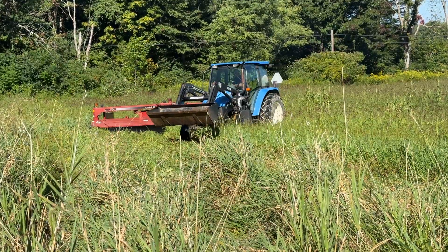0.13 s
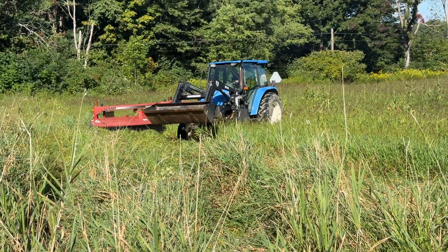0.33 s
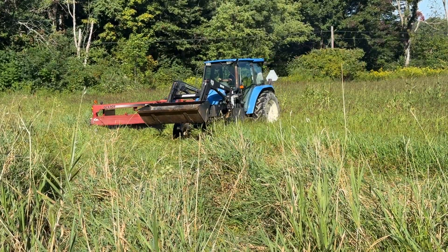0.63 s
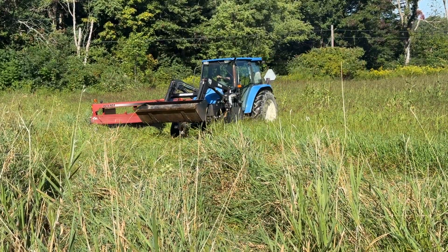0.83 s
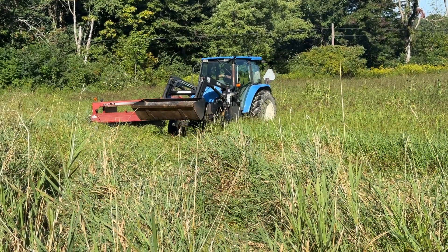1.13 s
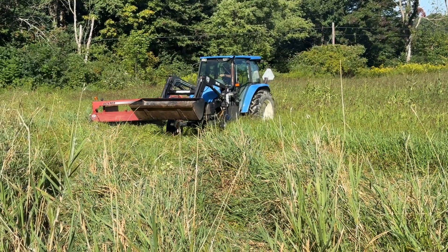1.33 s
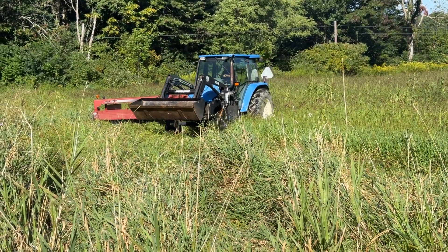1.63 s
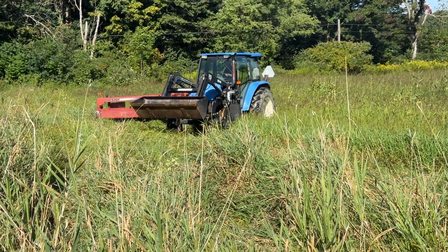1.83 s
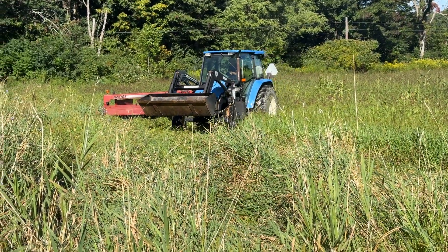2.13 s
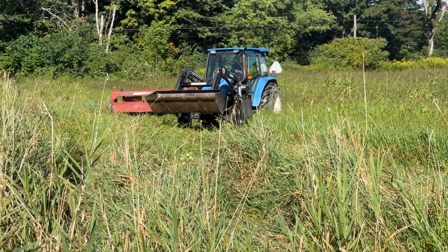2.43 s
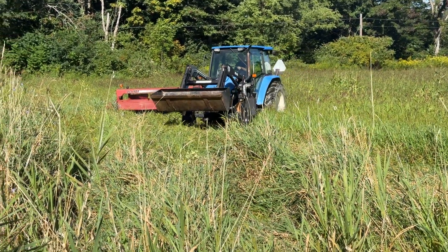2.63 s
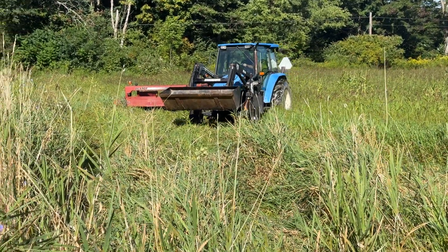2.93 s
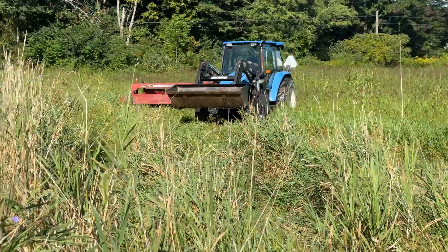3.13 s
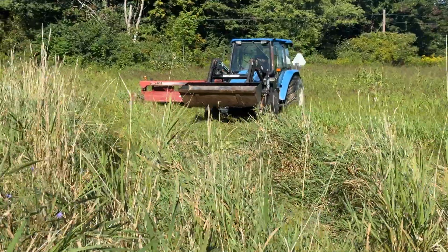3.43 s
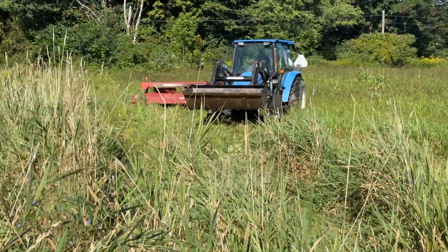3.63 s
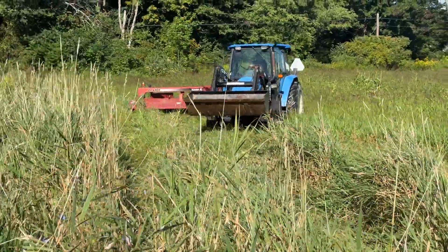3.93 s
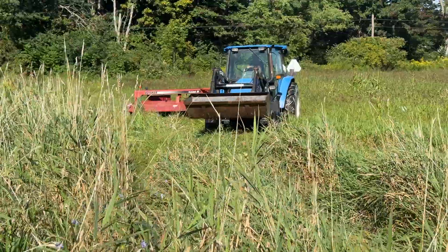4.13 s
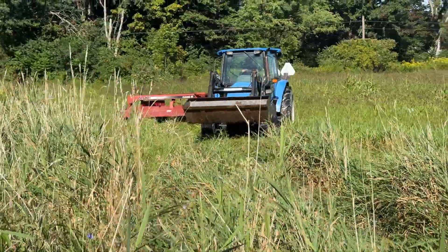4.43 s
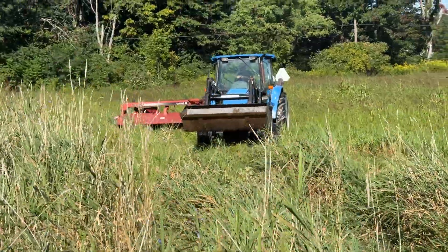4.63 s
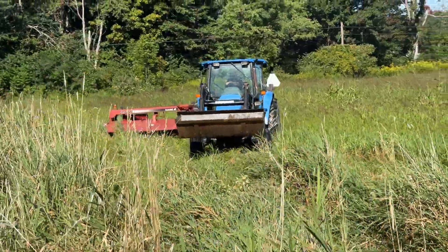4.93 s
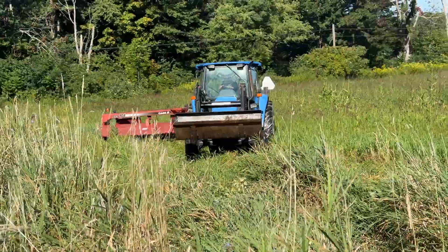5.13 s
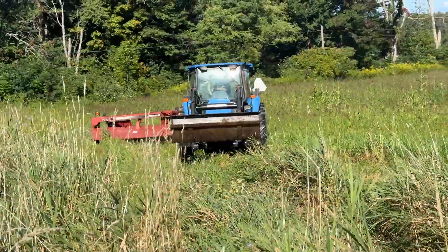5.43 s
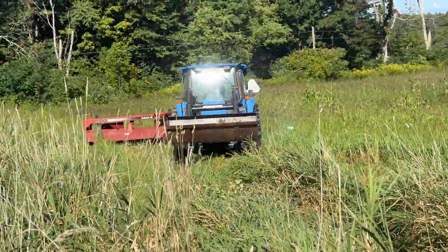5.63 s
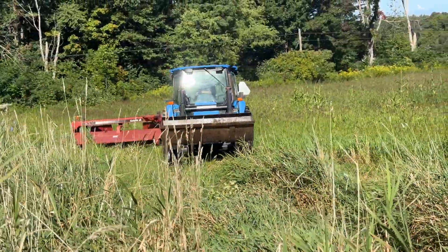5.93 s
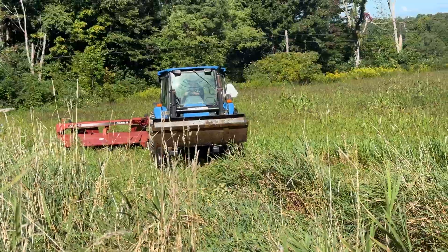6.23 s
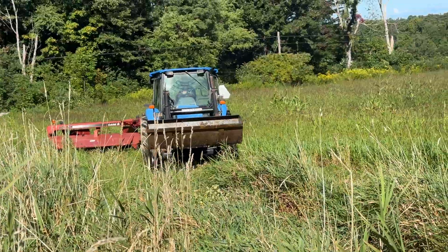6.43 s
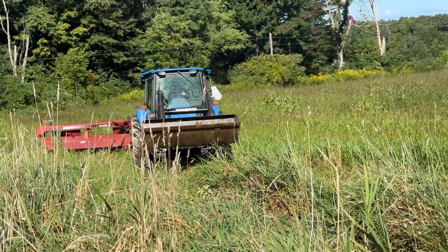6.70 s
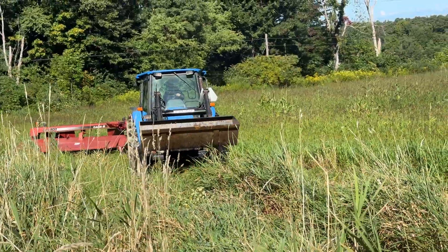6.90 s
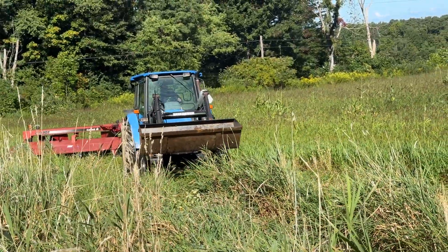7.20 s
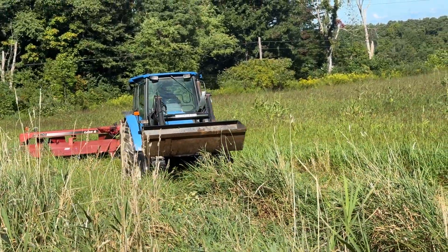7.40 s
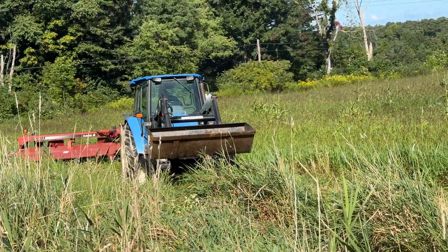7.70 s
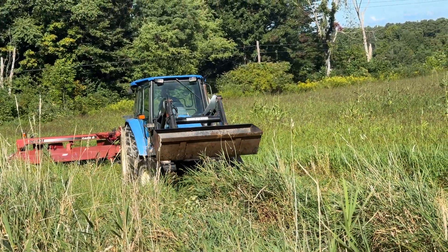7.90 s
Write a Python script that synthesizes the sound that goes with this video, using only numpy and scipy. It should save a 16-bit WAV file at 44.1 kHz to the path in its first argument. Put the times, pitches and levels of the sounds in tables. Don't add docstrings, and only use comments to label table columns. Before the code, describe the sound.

A diesel tractor drones and knocks steadily across a field while its disc mower hisses and clanks through tall grass, growing louder as it turns nearer.

```python
import sys
import numpy as np
from scipy import signal
from scipy.fft import rfft, irfft, next_fast_len
from scipy.io import wavfile
from scipy.ndimage import uniform_filter1d, map_coordinates

SR = 44100
rng = np.random.default_rng(int(sys.argv[2]) if len(sys.argv) > 2 else 0)


def dump_mix(stems):
    frames = np.atleast_2d(stems).T
    limited = np.clip(frames, -1, 1)
    pcm = np.round(limited * 32767).astype(np.int16)
    wavfile.write(sys.argv[1], SR, pcm)


def field_ratio(decibels):
    return 10 ** (np.asarray(decibels, dtype=float) / 20)


N = 355446

# (time [s], firing rate [1/s], blade-pass rate [1/s])
SPEED = [(0.0, 62.71, 85.15), (0.47, 63.04, 86.21), (0.95, 63.91, 87.37), (1.42, 63.23, 86.28),
         (1.9, 63.77, 87.02), (2.37, 65.32, 89.46), (2.84, 65.82, 89.87), (3.32, 66.02, 90.47),
         (3.79, 65.32, 89.26), (4.27, 65.21, 89.29), (4.74, 64.98, 88.91), (5.22, 65.04, 88.78),
         (5.69, 64.44, 88.22), (6.16, 64.31, 88.13), (6.64, 64.62, 88.35), (7.11, 64.24, 87.94),
         (7.59, 64.47, 88.27), (8.06, 63.1, 87.11)]
# (time [s], facing [0 flank - 1 front])
FACING = [(0, 0.26), (2.6, 0.28), (3.4, 0.39), (4.2, 0.64), (5.5, 0.69), (8.06, 0.52)]
# (time [s], level [dB])
LOAD = [(0, 0.5), (1, 0.5), (2, 1), (2.5, -2), (3, -6), (3.5, -2.5), (4, 0), (4.5, .5), (5.5, -0.5), (6, 1),
        (7, -1.5), (8.06, 0)]
# (time [s], level [dB])
APPROACH = [(0, -27.5), (2, -27.5), (2.6, -28.5), (3.5, -27.5), (4.5, -27.5), (5.3, -27), (6.2, -25.5),
            (7, -25), (8.06, -25.5)]
# (order [per firing], flank [dB], front [dB], growth with effort [dB/dB])
EXHAUST = [(1, -21.5, -20.5, 0.7), (2, -24, -17.5, -0.2), (3, -46.5, -28, 0.76),
           (1.75, -41.5, -28.5, -0.84)]
EXHAUST_LAG = [(1, -.175), (2, .4), (3, -.25), (1.75, -.1)]
# (order [per firing], flank [dB], front [dB])
BLOCK = [(3.75, -46, -47.5), (5.75, -56.5, -47), (7.25, -51, -39), (7.5, -52, -47.5), (9, -60, -32.5),
         (9.25, -46.5, -47), (9.5, -55, -36), (10.25, -52.5, -46), (11, -42, -54.5), (11.25, -48, -54),
         (12, -53, -55), (12.25, -53, -65), (12.75, -45, -62), (13.5, -42, -69)]
CYLINDERS = [-3.1, 0.33, 3.8, 0.42]
# (time [s], level [dB], width [s])
PUMP_SWELLS = [
    (1, -60, .7),
    (4.5, -55, .5),
    (5.4, -47, .3),
    (7.5, -50, .7),
]
# (order [per firing], time [s], level [dB], width [s])
PANELS = [(10.25, 3.2, -42, 1.0), (9, 4.4, -40, 1.0), (12.25, 2.4, -43, .45), (4.11, 3.5, -34, .8)]
# (frequency [Hz], density [dB/Hz])
FLANK_ROAR = [(80, -22.5), (140, -5), (180, -8), (350, -8.5), (400, -16.5), (500, -22.5), (600, -13),
              (640, -19), (800, -9), (1020, -29), (1220, -19.5), (1410, -12), (1570, -24), (2200, -24.5),
              (4800, -120)]
# (frequency [Hz], density [dB/Hz])
FRONT_ROAR = [(82, -27), (140, -14), (155, -8.5), (264, -7), (382, -11.5), (492, -13), (527, -12),
              (634, -17.5), (719, -16.5), (1150, -19), (2200, -29.5), (2860, -68), (4840, -120)]
# (order [per blade pass], flank [dB], front [dB], beat depth [dB], beat period [s], loudest at [s])
BLADES = [(1, -26.5, -27.5, 0.2, 3.9, 1.6), (2, -37.5, -34.5, 4.5, 5.1, 1.43),
          (3, -45, -33, 4.5, 6.4, 5.93), (4, -44, -34, 4.5, 6.9, 1.8), (6, -62, -17, 5, 9, .1)]
BLADE_WANDER = [(1, .01), (2, .13), (3, .2), (4, .2), (6, .25)]
# (order [per blade pass], flank [dB], front [dB])
GEARS = [(3.5, -54, -43), (5, -46.5, -41.5), (8, -46, -46.5), (9, -49.5, -62.5)]
# (time [s], level [dB])
CROP = [(0, -36), (.6, -38.5), (1.5, -36.5), (2, -38), (2.4, -35.5), (2.7, -38), (3.2, -36.5), (4, -35),
        (4.4, -33), (4.7, -34.5), (5, -33), (5.9, -34), (6.2, -32), (6.6, -35), (7, -32), (7.8, -32.5),
        (8.06, -32.5)]
# (frequency [Hz], density [dB/Hz])
STEMS = [(1200, -2.5), (1900, 1.5), (2800, 3), (4200, -1), (5400, -4), (7300, -6.5), (8500, -9.5),
         (11000, -20), (16000, -31)]
# (frequency [Hz], width [Hz], level [dB])
STEEL = [(2630, 1050, 0.5), (3490, 1920, -2), (5140, 300, 3), (8000, 2700, -16.5)]
# (frequency [Hz], width [Hz], level [dB])
KNIFE = [(2760, 90, 0), (2950, 200, -8)]
# (frequency [Hz], width [Hz], level [dB])
GUARD = [(2050, 60, 0)]
# (time [s], level [dB], width [s])
GUARD_RUBS = [
    (4.5, -42, .2),
    (5.05, -41, .28),
    (5.8, -44, .1),
]
# (time [s], level [dB], width [s])
BUMPS = [
    (1.6, -41.5, 0.31),
    (2.78, -39.5, 0.067),
    (3.14, -41, 0.092),
    (3.7, -36.5, 0.25),
    (5.1, -37.5, 0.38),
    (6.2, -48, 0.51),
    (7.16, -41, .1),
]
# (frequency [Hz], density [dB/Hz])
GROUND = [(20, -34), (35, -0.5), (55, 7), (100, 12), (160, -16), (260, -48)]
# (time [s], level [dB])
BREEZE = [(0, -58.5), (1.3, -58), (2.9, -58.5), (3.1, -59), (4.6, -51), (5.6, -47.5), (8.06, -49)]
# (time [s], level [dB], width [s])
GUSTS = [
    (1.55, -59.5, .1),
    (3.1, -52, .1),
    (3.41, -49, 0.23),
    (3.86, -51, 0.14),
    (4.19, -40, 0.13),
    (5.17, -46.5, .16),
    (6.2, -48, 0.12),
]
# (frequency [Hz], density [dB/Hz])
GRASS = [(2500, -33), (5000, -13), (8000, 4), (10000, 1.5), (13000, -3.5), (16000, -7)]
# (time [s], usual clank [dB], knife ring [dB])
SLACK = [(0, -26, -16), (1.5, -25, -17), (2.3, -23, -12), (2.8, -28, -17), (3.6, -25, -15), (3.85, -15, -9),
         (4.5, -14.5, -6), (5.15, -15, -10), (5.45, -18, -14), (6.1, -16, -13), (6.55, -17, -13),
         (7.1, -14.5, -15), (8.06, -16, -18)]
# (time [s], peak [dB])
LONE_CLANKS = [(0.231, -15.8), (0.44, -17.5), (0.649, -18.8), (0.695, -18.5), (0.902, -16), (0.97, -16),
               (1.2, -20.2), (1.246, -19), (1.408, -18.5), (1.547, -15), (1.593, -48), (1.778, -31.5),
               (1.985, -17.5), (2.053, -17), (2.167, -17.5), (2.234, -27), (2.257, -15.5), (2.302, -13),
               (2.369, -18), (2.436, -15.5), (2.481, -15), (2.548, -17.5), (3.215, -14.5), (3.726, -17.1)]
# (time [s], peak [dB])
HARD_CLANKS = [(3.905, -12.5), (3.972, -11), (4.017, -9.5), (4.084, -13), (4.353, -10.5), (4.398, -12),
               (4.488, -13.5), (4.532, -16), (4.555, -11), (4.645, -9.8), (4.69, -12), (4.735, -11.5),
               (4.802, -11.5), (4.915, -10.5), (4.96, -11), (5.072, -10), (5.162, -10), (6.136, -11.5),
               (6.181, -10), (6.294, -10.5), (6.34, -10), (6.453, -10.5), (6.702, -9.5), (6.929, -10),
               (6.974, -9.5), (7.02, -8.5), (7.451, -9), (7.655, -16), (7.815, -9.5), (7.883, -21)]
# (frequency [Hz], width [Hz], level [dB])
BAR = [(3010, 42, -1), (3660, 62, -4), (4660, 110, -6.5), (5110, 230, -6), (5480, 74, 0.5)]
# (time [s], level [dB], t60 [s])
SNAPS = [
    (0.222, -29, 0.091),
    (0.433, -26.5, 0.077),
    (.575, -31.5, 0.08),
    (0.64, -28, 0.03),
    (.69, -24.5, 0.041),
    (1.491, -21, 0.033),
    (1.577, -23, 0.1),
    (1.76, -27.5, 0.091),
    (7.651, -23, 0.076),
    (7.879, -17, 0.058),
]
# (frequency [Hz], width [Hz], level [dB])
STALK = [(3540, 1100, 3)]
# (frequency [Hz], left lead [rad])
PORTS = [(60, .03), (400, .19), (690, .22), (950, .45), (1210, -.75), (1500, -.45), (2000, 0), (2350, 0),
         (2800, .6), (4600, .27), (5400, 0), (6700, 0), (7240, 1.2), (7800, np.pi), (9300, np.pi),
         (9850, 2.1), (13400, 1.45), (15800, .3)]
# (frequency [Hz], left minus right [dB])
LEAN = [(60, .6), (300, .2), (700, 1.8), (1500, 1), (2000, 0)]
# (frequency [Hz], level [dB])
SCATTER = [(60, -32), (300, -25), (700, -21), (1500, -16), (1850, -19), (2100, -34), (2300, -34),
           (2550, -19), (4400, -21), (5300, -30), (5800, -60), (9400, -60), (10000, -9), (13000, -10),
           (16000, -20)]


def unit(x):
    return x / np.sqrt(np.mean(x ** 2) + 1e-20)


def along(points, hz):
    point_hz, value = np.transpose(points)
    return np.interp(np.log(hz + 1), np.log(point_hz + 1), value)


def curves(rows):
    time_s, *columns = np.transpose(rows)
    return [np.interp(np.arange(N) / SR, time_s, column) for column in columns]


def wobble(rate_hz):
    coarse = np.arange(0, N + 64, 64)
    knots = rng.standard_normal(SR // 100)
    return np.interp(np.arange(N), coarse, map_coordinates(knots, [coarse * rate_hz / SR]))


def swells(rows):
    t = np.arange(N) / SR
    return sum(field_ratio(db) * np.exp(-((t - s) / width_s) ** 2) for s, db, width_s in rows)


def burst(t, rise, t60):
    return (1 - np.exp(-(t / rise) ** 2)) * field_ratio(-60 * t / t60)


def tone(turns):
    return np.sqrt(2) * np.cos(2 * np.pi * turns)


def filtered(x, response):
    m = next_fast_len(N + SR // 2)
    return irfft(rfft(x, m) * response(np.fft.rfftfreq(m, 1 / SR)), m)[..., :N]


def coloured(x, spectrum):
    return unit(filtered(x, lambda hz: field_ratio(along(spectrum, hz))))


def ringing(x, modes):
    def response(hz):
        total = 0
        for k, (mode_hz, width_hz, db) in enumerate(modes):
            damping = 1j * hz * width_hz
            total = total + (-1) ** k * field_ratio(db) * damping / (mode_hz * mode_hz - hz * hz + damping)
        return total
    return filtered(x, response)


def patchy(patchy_db):
    z = signal.stft(rng.standard_normal(N), nperseg=512)[2]
    field = uniform_filter1d(rng.standard_normal(z.shape), size=6, axis=0)
    field = uniform_filter1d(field, size=12, axis=1)
    return signal.istft(z * field_ratio(patchy_db * unit(field)), nperseg=512)[1][:N]


def turns():
    return [np.cumsum(rate) / SR for rate in curves(SPEED)]


def heading(flank_db, front_db):
    return flank_db + np.clip(curves(FACING)[0], 0, 1) * (front_db - flank_db)


def orders(table, turning):
    wander_turns = .1
    total = 0
    for order, flank_db, front_db in table:
        gain = field_ratio(heading(flank_db, front_db) + 1.33 * wobble(4))
        total = total + gain * tone(order * turning + rng.random() + wander_turns * wobble(2.98))
    return total


def exhaust(firings):
    effort_db, = curves(LOAD)
    total = 0
    for (order, lag_turns), (_, flank_db, front_db, growth) in zip(EXHAUST_LAG, EXHAUST):
        gain = field_ratio(heading(flank_db, front_db) + growth * effort_db + 0.71 * wobble(12))
        total = total + gain * tone(order * firings + lag_turns + 0.0021 * wobble(3.9))
    return total


def combustion(firings):
    strength = field_ratio(np.asarray(CYLINDERS))[np.floor(firings).astype(int) % 4]
    return strength * burst(firings % 1 / 64, rise=0.001, t60=0.43)


def roar(firings):
    knock_db = -5
    level_db, = curves(APPROACH)
    facing = np.clip(curves(FACING)[0], 0, 1)
    patterns = rng.standard_normal((12, 2048))
    place = [np.arange(N) * .9 / SR, firings / 4 % 1 * 2048]
    knock = map_coordinates(patterns, place, order=1, mode="grid-wrap")
    source = patchy(patchy_db=1.8) + field_ratio(knock_db) * unit(knock * combustion(firings))
    flank = (1 - facing) * coloured(source, FLANK_ROAR)
    front = facing * coloured(source, FRONT_ROAR)
    return field_ratio(level_db - 0.5) * (flank + front)


def whines(firings):
    pump_order, pump_db = 61.5, -61
    wander_turns = .004
    rows = [(pump_order, field_ratio(pump_db) + swells(PUMP_SWELLS))]
    rows += [(order, swells([swell])) for order, *swell in PANELS]
    total = 0
    for order, gain in rows:
        total = total + gain * field_ratio(1.5 * wobble(6)) * tone(order * (firings + wander_turns * wobble(25)))
    return total


def bonnet(firings):
    harsh_at, ring_order = 2.1, 11
    since = (firings - harsh_at) % 4
    ring = np.sin(2 * np.pi * (ring_order * since + .2 * wobble(9)))
    gain = field_ratio(heading(flank_db=-41, front_db=-14) + 3 * wobble(8))
    return gain * burst(since / 64, rise=0.0038, t60=0.053) * ring


def blades(passes):
    lead_turns, t = -.37, np.arange(N) / SR
    total = 0
    for (order, wander_turns), row in zip(BLADE_WANDER, BLADES):
        _, flank_db, front_db, beat_db, period_s, top_s = row
        beat = beat_db * np.cos(2 * np.pi * (t - top_s) / period_s)
        gain = field_ratio(heading(flank_db, front_db) + beat + 0.71 * wobble(7))
        total = total + gain * tone(order * passes + lead_turns + wander_turns * wobble(2.5))
    return total


def cutting(passes, firings):
    rattle_db, guard_db = -9.5, -48
    effort_db, = curves(CROP)
    disc = passes / 2 + .3
    strength = field_ratio(rng.uniform(-4, 4, SR // 50))[np.floor(disc).astype(int)]
    gate = strength * burst(disc % 1 / 44, rise=.002, t60=.045)
    rattle = unit(gate) * coloured(rng.standard_normal(N), STEMS)
    rattle += 0.31 * unit(ringing(gate * rng.standard_normal(N), STEEL + KNIFE))
    guard = unit(ringing((gate + 0.31) * rng.standard_normal(N), GUARD))
    guard_gain = (field_ratio(guard_db) + swells(GUARD_RUBS)) * field_ratio(-2)
    hiss = field_ratio(1.1 * wobble(27)) * coloured(patchy(patchy_db=0.5), STEMS)
    clatter = unit(combustion(firings)) * coloured(rng.standard_normal(N), STEMS)
    return field_ratio(effort_db) * (hiss + 0.36 * clatter + field_ratio(rattle_db) * rattle) + guard_gain * guard


def rumble():
    rolling_db = -43
    gain = (field_ratio(rolling_db) + swells(BUMPS)) * field_ratio(7.0)
    return gain * coloured(rng.standard_normal(N), GROUND)


def rustle():
    gain = (field_ratio(curves(BREEZE)[0]) + swells(GUSTS)) * field_ratio(5.5 + 1.2 * wobble(22))
    return gain * coloured(patchy(patchy_db=1.0), GRASS)


def clanks(passes):
    spread_db, rebound_db, ring_scatter_db = 2.8, 5, 2
    scrape_t60_s = .046
    tick_db, tick_s = 10, .0035
    disc = passes / 2 + .42
    start = np.interp(np.arange(1, int(disc[-1])), disc, np.arange(N))
    usual_db, ring_db = (c[start.astype(int)] for c in curves(SLACK))
    chance = rng.random((len(start), 2))
    strength_db = usual_db + spread_db * np.log(chance[:, 0] + 1e-3)
    ring_db = ring_db + rng.normal(0, ring_scatter_db, len(start))

    hard_s, hard_db = np.transpose(list(LONE_CLANKS) + list(HARD_CLANKS))
    turn = np.abs(hard_s[:, None] * SR - start).argmin(axis=1)
    strength_db[np.minimum(turn + 1, len(start) - 1)] -= rebound_db
    strength_db[turn] = hard_db - 2.0

    scrape, ring = np.zeros((2, N + SR))
    t = np.arange(SR // 25) / SR
    scrape_shape = burst(t, rise=0.0021, t60=scrape_t60_s)
    ring_shape = burst(t, rise=0.0022, t60=0.029)
    onset = (start + SR * .002 * (chance[:, 1] - 1)).astype(int)
    for at, db, knife_db in zip(onset, strength_db, ring_db):
        noise = rng.standard_normal((2, len(t)))
        scrape[at:][:len(t)] += field_ratio(db - 15.0) * unit(scrape_shape * noise[0])
        scrape[at + round(tick_s * SR)] += field_ratio(db + tick_db) * np.sign(noise[0, 0])
        ring[at:][:len(t)] += field_ratio(db + knife_db - 15.0) * unit(ring_shape * noise[1])
    return field_ratio(5.0) * ringing(scrape[:N], STEEL + BAR) + field_ratio(22.5) * ringing(ring[:N], KNIFE)


def snaps():
    shape, t = np.zeros(N + SR), np.arange(SR // 4) / SR
    for s, db, t60_s in SNAPS:
        shape[round(s * SR):][:len(t)] += field_ratio(db) * burst(t, rise=0.0032, t60=t60_s)
    crack = coloured(rng.standard_normal(N), STEMS)
    hollow = unit(ringing(rng.standard_normal(N), STALK))
    return shape[:N] * (crack + hollow)


def scene():
    firings, passes = turns()
    engine = exhaust(firings) + orders(BLOCK, firings) + roar(firings) + whines(firings) + bonnet(firings)
    mower = blades(passes) + orders(GEARS, passes) + cutting(passes, firings) + clanks(passes) + snaps()
    return np.tile(engine + mower + rumble() + rustle(), (2, 1))


def scattered(x):
    hz, _, z = signal.stft(x, SR, nperseg=1024)
    phase = np.exp(2j * np.pi * rng.random(z.shape))
    z = z * field_ratio(along(SCATTER, hz) + 5.0)[:, None] * phase
    return signal.istft(z, nperseg=1024)[1][:N]


def roll_off(x):
    return signal.sosfilt(signal.butter(12, 16180, fs=SR, output="sos"), x)


def record(dry):
    top_hz = 15870
    half = np.array([[.5], [-.5]])
    ports = filtered(dry, lambda hz: np.exp(1j * half * along(PORTS, hz)) * field_ratio(half * along(LEAN, hz)))
    heard = filtered(ports + 2 * half * scattered(dry[0]), lambda hz: hz < top_hz)
    return roll_off(heard)


dry = scene()
out = record(dry)
dump_mix(out)
```